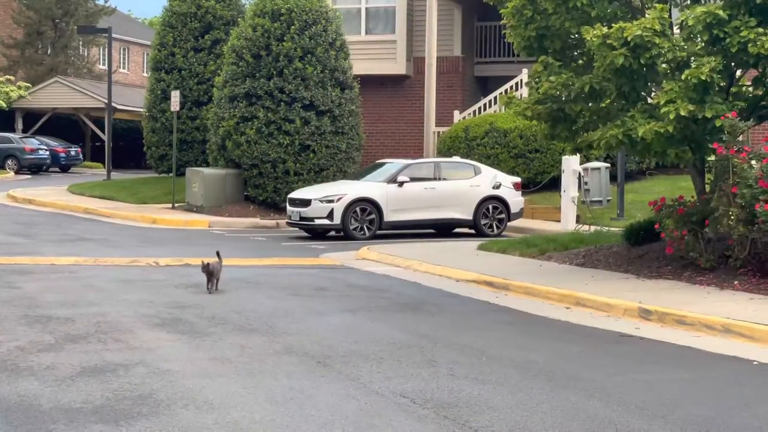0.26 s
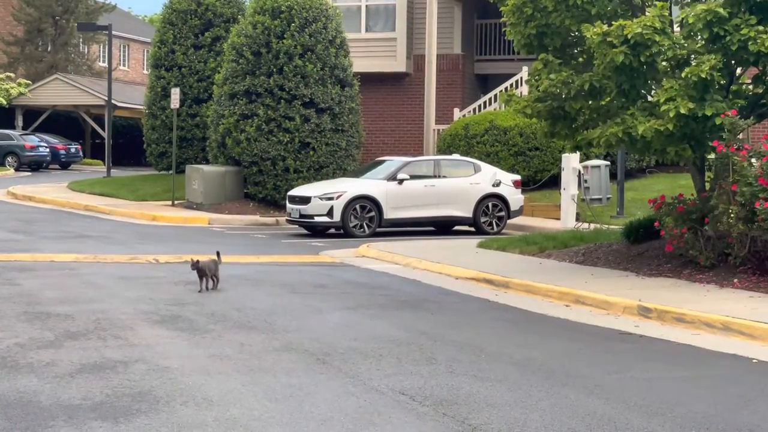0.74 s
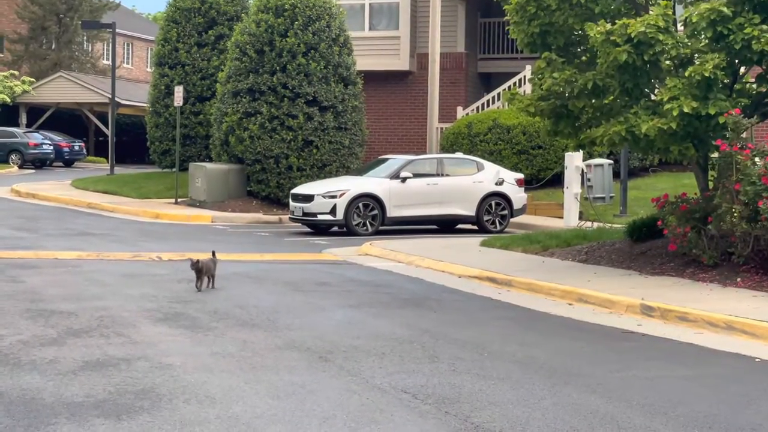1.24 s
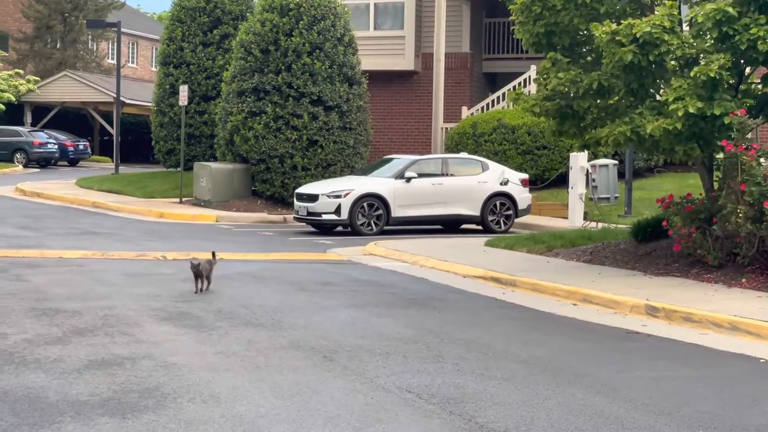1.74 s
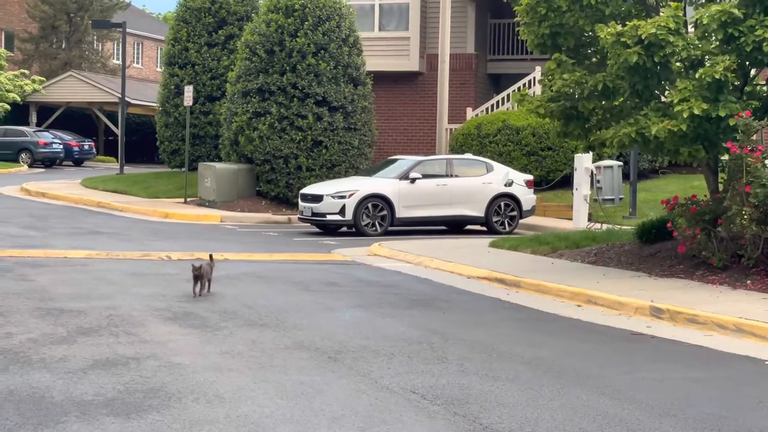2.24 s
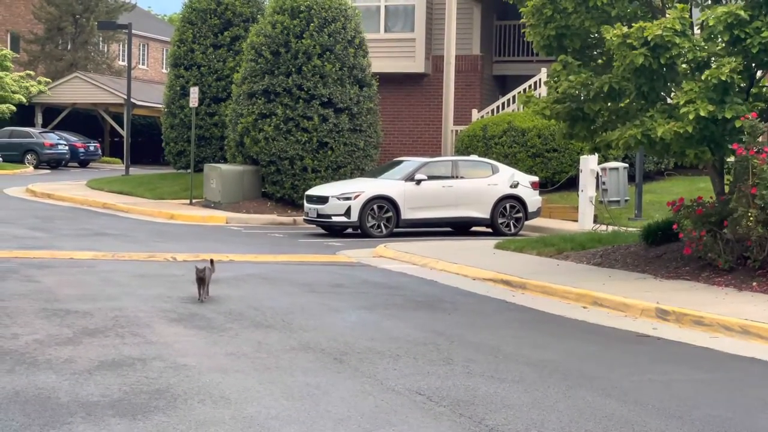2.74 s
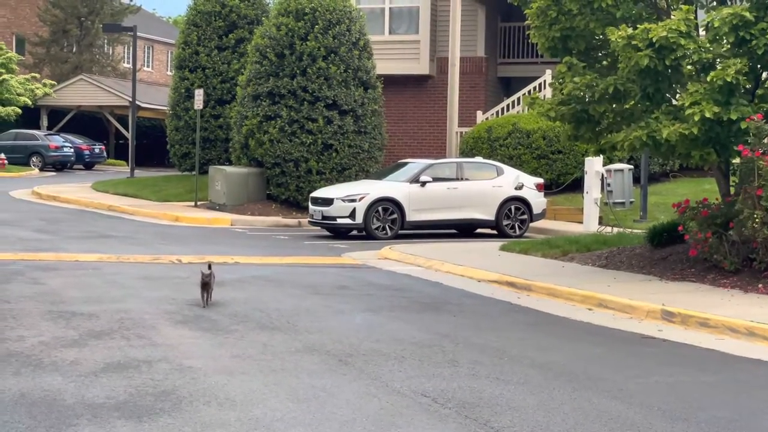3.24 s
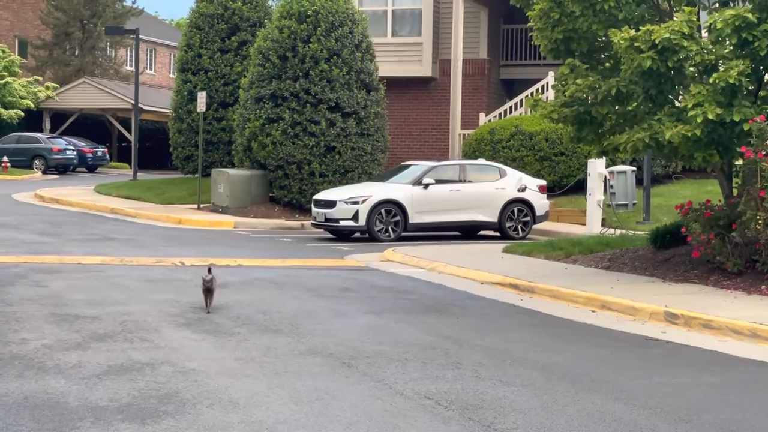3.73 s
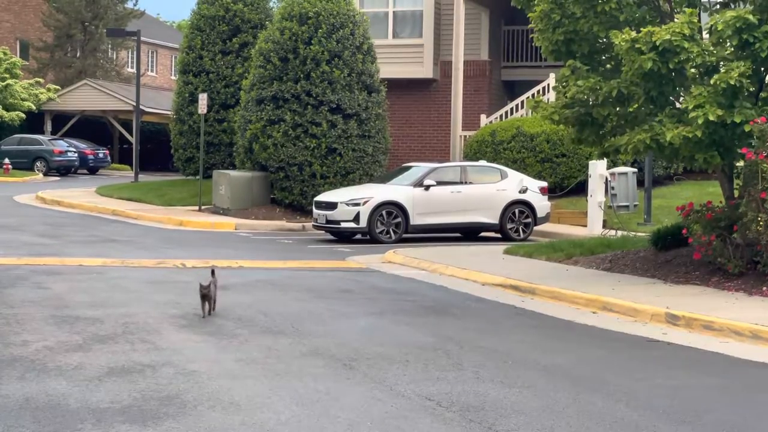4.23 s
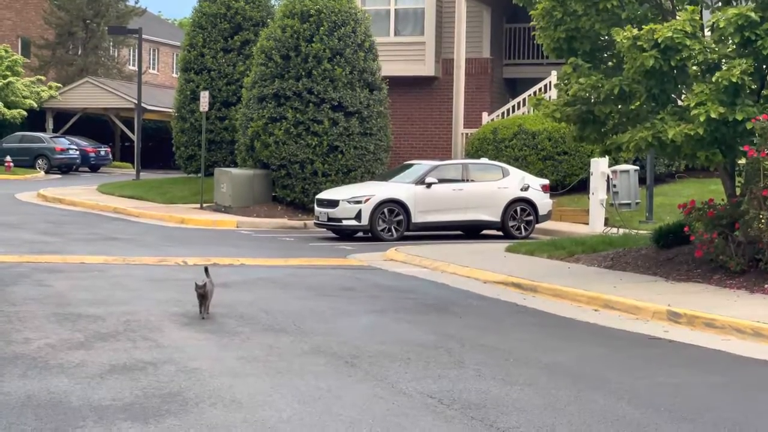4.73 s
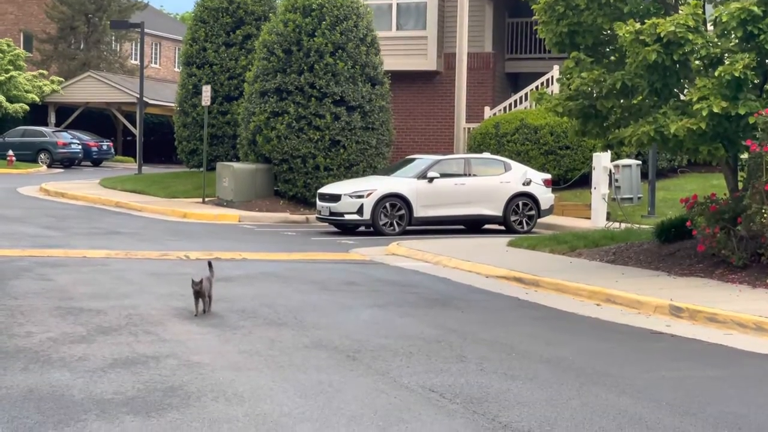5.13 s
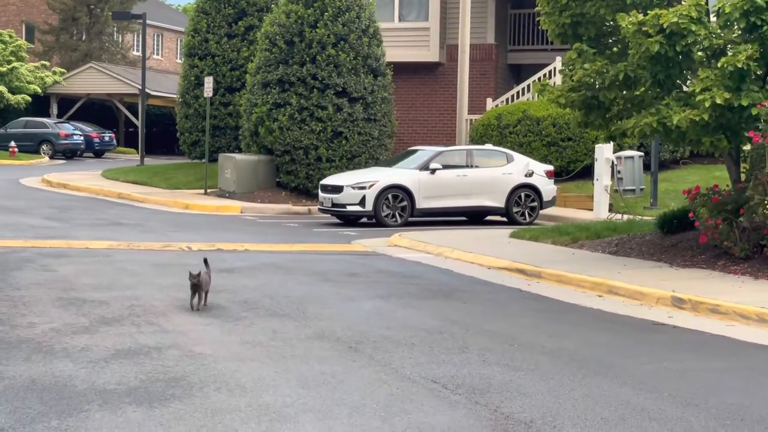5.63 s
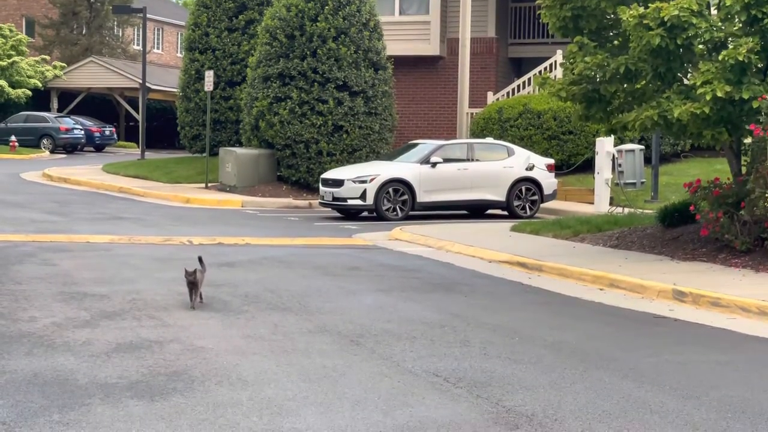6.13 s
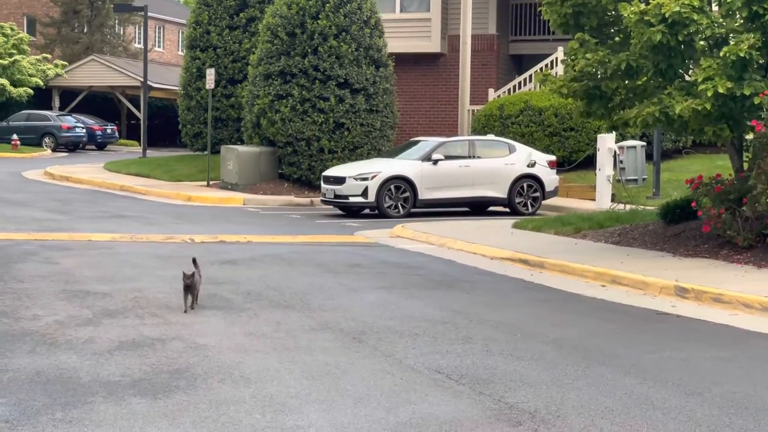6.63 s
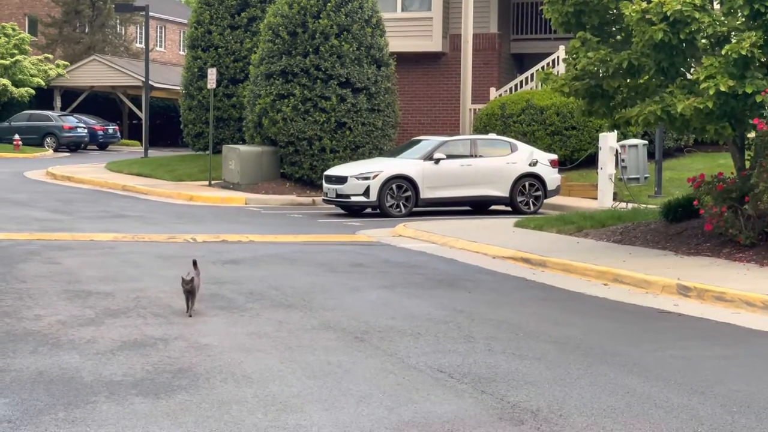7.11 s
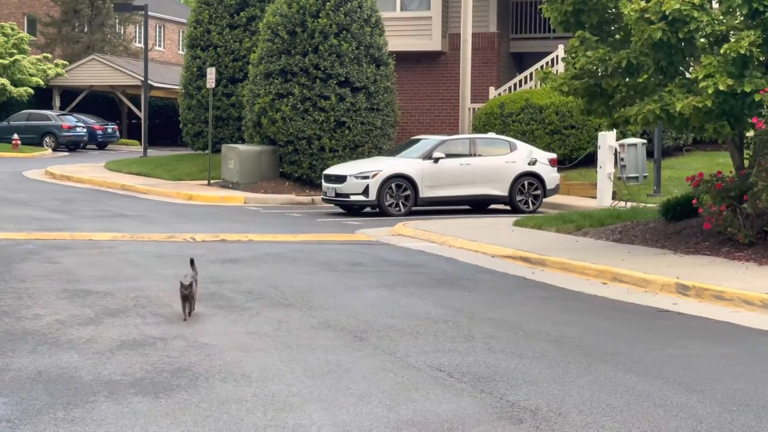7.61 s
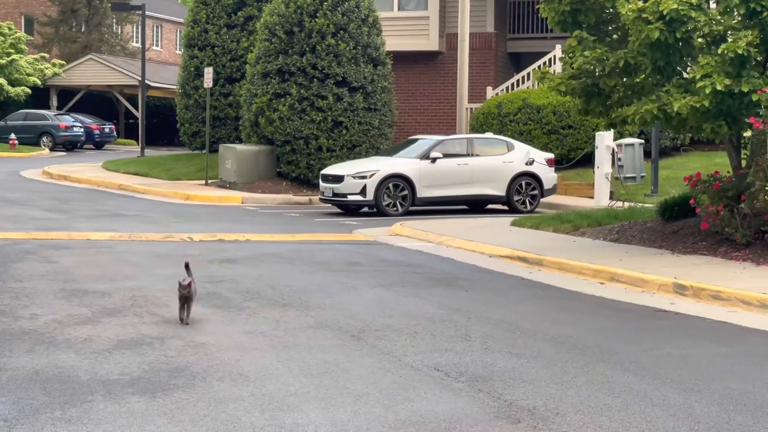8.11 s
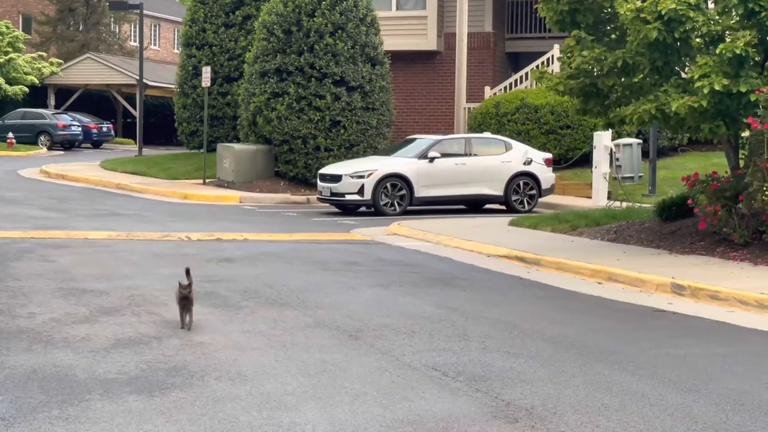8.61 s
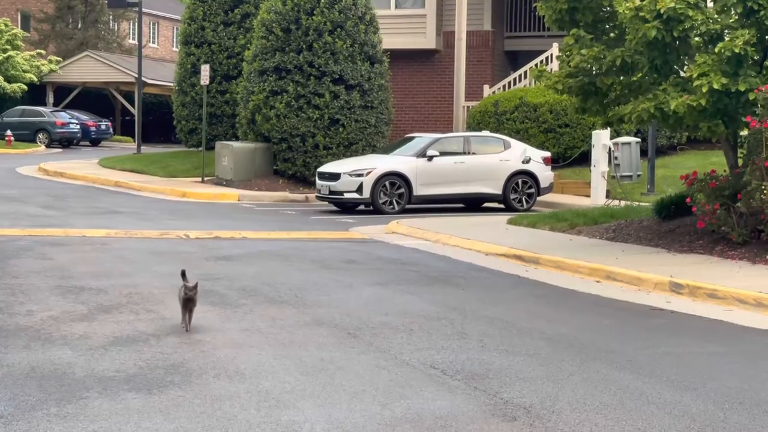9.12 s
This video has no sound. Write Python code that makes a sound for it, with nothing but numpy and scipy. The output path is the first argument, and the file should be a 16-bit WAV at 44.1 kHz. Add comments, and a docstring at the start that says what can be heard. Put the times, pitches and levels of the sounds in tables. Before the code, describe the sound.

A steady, soft low rumble of distant traffic and machinery, with a wavering deep motor hum around 70 Hz, fills an open car park and recedes very slightly. Songbirds sing above it, echoed briefly by brick walls. From 0 to 2 s come rapid harsh chirps and quick sweeps, with two tiny dry clicks near 0.8 s. More warbled chirps follow at 2.8-3.6 s. Mellow sliding whistles around 2.5-3 kHz stand out at 3.8-6 s, strongest near 4.4-4.7, with a dense chirp cluster at 5 s and a click at 5.3. Another burst comes at 6.2-6.6 s. Then it is sparser, a small high two-part call recurring about every second throughout. Clicks tick at 7.9 and 8.1 s. Buzzing trills near 4.7 kHz sound at 8.3 and 8.8 s, then chirps and a thin, piercing whistle at 9.2 s. Very faint far birds twitter behind.

```python
"""Songbirds near and far chirp, whistle and buzz around an open car park between brick walls.
Their notes are sines on moving pitch curves, echoed by sparse reflections off the walls.
Far traffic and machinery make a steady low rumble of shaped noise, with narrow noise drones.
A few small dry clicks close by are noise snaps that ring short resonances."""
import sys
import numpy as np
from scipy import signal
from scipy.fft import rfft, irfft, next_fast_len
from scipy.io import wavfile
from scipy.ndimage import uniform_filter1d

SR = 44100
rng = np.random.default_rng(int(sys.argv[2]) if len(sys.argv) > 2 else 0)


def dump_mix(stems):
    """Bounce the given channels to the path in sys.argv[1] as a 16-bit WAV at rate SR."""
    frames = np.atleast_2d(stems).T  # one column per channel
    limited = np.clip(frames, -1, 1)  # hard clip at full scale
    pcm = np.round(limited * 32767).astype(np.int16)
    wavfile.write(sys.argv[1], SR, pcm)


def to_linear_factor(level_db):
    """Convert decibel levels (scalar or array-like) to linear amplitude factors."""
    exponent = np.asarray(level_db, float) / 20
    return 10 ** exponent


N = 412776

# traffic spectrum before overall scaling: f/Hz, relative level/dB
RUMBLE = [(20, -29.5), (38, -4), (50, 0.5), (62, 0.93), (86, -3), (230, -10), (314, -23.5), (510, -28),
          (1000, -30), (1250, -34), (1900, -38), (4550, -52.5), (6000, -61.5), (8700, -66.5),
          (11400, -67.5), (12300, -73.5), (13000, -88), (22000, -120)]
RUMBLE_RMS_DB = -38
# left-right likeness of the rumble: f/Hz, likeness/1
RUMBLE_LIKENESS = [(60, 0.99), (230, 0.97), (440, 0.79), (860, 0.68), (1500, 0.43), (2100, 1), (4500, 1),
                   (6000, 1), (13000, 0.98)]
# rumble balance: f/Hz, left minus right level/dB
RUMBLE_BALANCE = [(60, 1), (150, 1.0), (350, 1.5), (860, 3), (2080, 0.5), (5040, -1), (12200, 1)]
# steady level slope as traffic recedes: f/Hz, slope/(dB/s)
RECEDE = [(100, -0.35), (200, -.1), (400, -0.71), (900, -0.47), (6000, 0)]
# level drift of the band around THRUM_HZ: t/s, level/dB
THRUM = [(0, 0), (1.2, 0.5), (3, 3), (5, -4), (6, 2.5), (7.3, -2.5), (9.36, 3)]
THRUM_HZ, THRUM_OCTAVES = 184, 0.55
# wavering motor drones: f/Hz, width of each resonator pass/Hz, rms level/dB
DRONES = [(70.5, 27, -42.5), (162.7, 31, -55), (360.9, 24, -65.5)]

# Bird levels are those of the voice, before flutter, distance and echo.
CHORUS_DB, CHORUS_HZ, CHORUS_SPREAD_HZ = -82, 5400, 700
# harsh warbled chirps: t/s, length/s, starting centre f/Hz, warble depth/Hz, level of a strand/dB
CHIRPS = [(0.0, 0.11, 3100, 450, -76), (0.3, .12, 4780, 803, -80), (0.93, .22, 4300, 847, -70.5),
          (1.2, 0.28, 3850, 300, -79.5), (1.56, 0.13, 5250, 402, -72), (1.72, 0.18, 5160, 300, -78),
          (1.909, .22, 3760, 356, -70.5), (1.889, .17, 4700, 350, -76.5), (2.801, .14, 4750, 1100, -76),
          (2.87, 0.16, 3500, 453, -70.5), (3.1, 0.075, 5000, 600, -81), (3.28, .22, 3820, 350, -69),
          (3.278, .17, 4690, 300, -75), (3.47, .12, 4540, 955, -76), (4.76, .1, 4300, 800, -77),
          (4.99, .16, 4460, 400, -74), (4.98, .12, 6200, 600, -90), (5.053, .15, 3300, 400, -66),
          (5.58, .12, 2900, 453, -73), (6.22, 0.32, 5700, 500, -87.5), (6.22, 0.14, 4300, 250, -69),
          (6.302, .15, 3300, 350, -66.5), (6.418, .07, 4420, 200, -78), (8.623, .1, 5200, 900, -83),
          (9.042, 0.22, 3750, 354, -71), (9.08, .14, 4940, 450, -70)]
CHIRP_SAG_HZ_PER_S, CHIRP_FADE_DB, CHIRP_RISE_S = -500, -4.5, 0.019
STROKES_PER_S = 30
FLUTTER_RMS_DB = 4.5  # leaves and moving air break notes up
# quick straight sweeps: t/s, length/s, from f/Hz, to f/Hz, level/dB
SWEEPS = [(0.155, 0.038, 4100, 4600, -72), (0.19, 0.018, 5930, 5340, -67), (0.218, 0.033, 5400, 4200, -73),
          (0.27, .07, 3750, 3100, -69), (0.268, 0.06, 3880, 5130, -70), (0.299, 0.056, 5800, 4770, -73.5),
          (0.92, .07, 4840, 5600, -78), (0.93, 0.089, 4400, 3400, -74), (1.645, 0.018, 3600, 4700, -67),
          (1.678, .025, 3600, 5000, -65), (1.89, .04, 5460, 4240, -72), (2.22, 0.063, 5800, 5200, -81),
          (3.254, 0.03, 5000, 3880, -65), (5.045, 0.032, 2750, 3500, -61),
          (5.087, 0.042, 3400, 2300, -64.5), (5.6, 0.071, 3600, 3090, -72), (6.265, 0.026, 4030, 2920, -69),
          (6.29, 0.034, 4470, 3300, -63.5), (6.32, 0.032, 4270, 3300, -66), (6.423, .02, 3500, 2750, -69),
          (6.57, .04, 5700, 5000, -83), (7.2, .1, 3200, 2390, -80), (7.6, 0.077, 3850, 3500, -78)]
SWEEP_WARBLE_HZ, WHISTLE_WARBLE_HZ = 90, 35
# two-part call about once a second: hook t/s, lead level/dB, hook level/dB
HOOKS = [(0.74, -85, -88), (1.79, -78, -72), (2.65, -73.5, -75.5), (3.52, -79, -73), (4.53, -87, -69),
         (5.66, -82, -68), (6.75, -86, -69), (7.77, -85, -68), (8.5, -84, -73)]
LEAD_HZ, LEAD_EARLY_S, LEAD_S = 5250, .045, .06
HOOK_START_HZ, HOOK_DIP_HZ, HOOK_END_HZ, HOOK_S, HOOK_DIP_DB = 4300, 4030, 4420, .075, -2.5
# held whistles: t/s, length/s, from f/Hz, held f/Hz, starting level/dB
WHISTLES = [(3.45, .08, 2700, 2540, -67.5), (3.873, .11, 2650, 2500, -70.5),
            (3.84, 0.097, 3050, 2950, -74.5), (4.039, 0.055, 2670, 2610, -67),
            (4.416, .11, 3650, 2800, -59), (4.55, .05, 2880, 2830, -61.5), (4.589, 0.15, 2440, 2567, -58.5),
            (4.68, 0.054, 2910, 2880, -63), (4.791, .06, 2550, 2460, -68), (4.861, .1, 2550, 2610, -71),
            (4.99, .12, 2650, 2760, -63.5), (5.01, .04, 5660, 5700, -80), (5.009, 0.051, 3950, 3750, -70),
            (5.13, .04, 2290, 2130, -69), (5.534, .03, 3050, 2990, -62), (5.58, .09, 2700, 2440, -66),
            (5.742, 0.058, 2720, 2600, -66.5), (5.82, .07, 2650, 2460, -69), (5.93, .06, 2550, 2500, -76),
            (9.03, .23, 3780, 3870, -65), (9.077, 0.18, 3420, 3450, -68), (9.342, .02, 3400, 3330, -64)]
SLIDE_S, WHISTLE_FADE_DB = .022, -3
# one list per buzzing trill: t/s, level/dB, centre f/Hz
BUZZES = [
    [(8.3, -75, 4840), (8.326, -60, 4780), (8.392, -62.5, 4750), (8.4, -65, 4750), (8.43, -57.5, 4790),
     (8.596, -78, 4830), (8.62, -73, 4810)],
    [(8.735, -69, 4570), (8.763, -59, 4620), (8.797, -52, 4640), (8.857, -62.5, 4620), (8.905, -58.5, 4660),
     (9.043, -73, 4600), (9.07, -65, 4640)],
]
BUZZ_PER_S, BUZZ_DEPTH_HZ, BUZZ_THROB_RATIO = 180, 272, 0.23
# thin high whistle: t/s, level/dB
SEEP = [(9.145, -84), (9.165, -68), (9.204, -55.5), (9.228, -79), (9.25, -54), (9.28, -51.5), (9.36, -65)]
SEEP_HZ = 7255
YARD_T60_S, YARD_LIKENESS, YARD_RISE_S = 0.78, 0.98, 0.012
YARD_DULL_HZ = 6560  # leaves and air take treble out of the echoes
NEAR_YARD_DB, FAR_YARD_DB, FAR_DIRECT_DB = -4.5, -0.5, -3  # far: more echo than direct sound

# clicks: t/s, direct peak level/dB, colour f/Hz, ring t60/s, echo delay/s
CLICKS = [(0.7774, -30.5, 7600, 0.013, .0023), (0.8404, -33, 8250, 0.015, .0045),
          (5.2908, -32.5, 7570, 0.0075, .0018), (7.8406, -60.5, 6000, .012, .0027),
          (7.9155, -32.5, 8900, 0.006, .0015), (8.132, -29.5, 6670, 0.0088, .0022),
          (8.9436, -64, 6300, .012, .003)]
# modes shared by all clicks: f/Hz, width of each resonator pass/Hz, level re colour mode/dB
CLICK_BODY = [(3500, 1500, -9), (5800, 1400, -6.5), (9720, 800, -2.5), (11300, 1100, -5.5),
              (14800, 1500, -14)]
CLICK_ECHO_DB, CLICK_TAIL_DB, CLICK_TAIL_T60_S = -16.5, -19, .3

# phase gap of the two microphone ports, out of step in the treble: f/Hz, left lead/rad
PORTS = [(2200, 0), (3200, 0.64), (4600, 0.5), (6800, -1.2), (7750, -0.5), (8700, 0.1), (9650, -2.5),
         (10600, -3), (11540, -6.5), (12500, -6), (13500, -7.3)]
LOW_CUT_HZ = 40.5


def evened(x):
    """Scales to rms 1."""
    return x / np.sqrt(np.mean(x ** 2) + 1e-20)


def read(points, hz):
    """Interpolates (f/Hz, value) on a log-frequency axis."""
    f, value = np.transpose(points)
    return np.interp(np.log(hz + 1), np.log(f + 1), value)


def add(mix, s, sound):
    """Mixes a sound in at time s, in place."""
    part = mix[round(s * SR):][:len(sound)]
    part += sound[:len(part)]


def resonate_twice(x, hz, width_hz):
    """Two passes of a fixed resonance with peak gain 1."""
    b, a = signal.iirpeak(hz, hz / width_hz, SR)
    return signal.lfilter(b, a, signal.lfilter(b, a, x))


def wander(size, hz):
    """Smooth low-passed noise of rms 1, up to about hz."""
    b, a = signal.butter(2, hz, fs=SR)
    return evened(signal.lfilter(b, a, rng.standard_normal(size + 2000))[2000:])


def whistle(hz, db, fade_s=0.0028):
    """Sine of rms level db on a pitch curve, with soft ends."""
    index = np.arange(len(hz))
    edge = np.minimum(index, index[::-1]) / (fade_s * SR)
    envelope = np.sin(np.pi / 2 * np.minimum(edge, 1))
    return np.sqrt(2) * to_linear_factor(db) * np.sin(2 * np.pi * np.cumsum(hz) / SR) * envelope


def voice(hz, db, warble_hz, strokes=False):
    """One strand of song: whistle with uneven warble, or with repeated steep falling strokes."""
    if strokes:
        cycles = STROKES_PER_S * np.arange(len(hz)) / SR + .15 * wander(len(hz), 12)
        swing = 1.5 - 3 * (cycles % 1)
    else:
        swing = 1.6 * np.tanh(.45 * wander(len(hz), 60))
    rasp_hz = 35 * wander(len(hz), 150)
    flutter_db = FLUTTER_RMS_DB * wander(len(hz), 45)
    return whistle(hz + warble_hz * swing + rasp_hz, db + flutter_db)


def sampled(rows):
    """Start time, then time and the columns of a curve at every sample."""
    s, *columns = np.transpose(rows)
    t = np.arange(s[0], s[-1], 1 / SR)
    return s[0], t, *(np.interp(t, s, c) for c in columns)


def tail(t60_s, likeness, rise_s):
    """Sparse random-sign reflections that die away, partly alike left and right; left energy 1."""
    size = SR // 2
    hits = rng.random((2, size)) < 1500 / SR
    taps = rng.choice([-1., 1.], (2, size)) * hits
    t = np.arange(size) / SR
    taps *= to_linear_factor(-60 * t / t60_s) * np.minimum(t / rise_s, 1)
    right = likeness * taps[0] + np.sqrt(1 - likeness ** 2) * taps[1]
    return np.array([taps[0], right]) / np.linalg.norm(taps[0])


def rumble():
    """Random short-time spectra of far engines, tyres and fans that slowly recede."""
    frames, hz = N // 512 + 5, np.fft.rfftfreq(2048, 1 / SR)
    a, b, c, d, patches = rng.standard_normal((frames, 1025, 5)).T
    patches = evened(uniform_filter1d(uniform_filter1d(patches, 16, 0), 10, 1))
    t = np.arange(frames) * 512 / SR
    thrum_band = np.exp(-(np.log2((hz + 1) / THRUM_HZ) / THRUM_OCTAVES) ** 2)
    recede_db = np.outer(read(RECEDE, hz), t - t.mean())
    thrum_db = np.outer(thrum_band, np.interp(t, *np.transpose(THRUM)))
    balance_db = read(RUMBLE_BALANCE, hz)[:, None] * [[[.5]], [[-.5]]]
    likeness = np.clip(read(RUMBLE_LIKENESS, hz), -1, 1)[:, None]
    left = a + 1j * b
    right = likeness * left + np.sqrt(1 - likeness ** 2) * (c + 1j * d)
    level_db = read(RUMBLE, hz)[:, None] + 0.75 * patches + recede_db + thrum_db + balance_db
    spectra = np.array([left, right]) * to_linear_factor(level_db)
    noise = signal.istft(spectra, nperseg=2048, noverlap=1536)[1][:, :N]
    return to_linear_factor(RUMBLE_RMS_DB) * evened(noise)


def drones():
    """Distant motors: noise through narrow resonances, wavering in level."""
    out = np.zeros(N)
    for hz, width_hz, db in DRONES:
        out += to_linear_factor(db) * evened(resonate_twice(rng.standard_normal(N), hz, width_hz))
    return out


def chorus(count=40):
    """Much further birds: faint short gliding chirps at random moments."""
    out = np.zeros(N)
    for at, pitch, glide in rng.random((count, 3)):
        centre_hz = CHORUS_HZ + CHORUS_SPREAD_HZ * (2 * pitch - 1)
        hz = centre_hz + np.linspace(0, 900 * (glide - .6), 3000)
        add(out, at * N / SR, whistle(hz + 250 * wander(3000, 80), CHORUS_DB))
    return out


def chirps():
    """Three warbling strands, one in falling strokes, sag in pitch and fade."""
    out = np.zeros(N)
    for s, length_s, start_hz, warble_hz, db in CHIRPS:
        t = np.arange(0, length_s, 1 / SR)
        hz = start_hz + CHIRP_SAG_HZ_PER_S * t
        fading_db = db + CHIRP_FADE_DB * t / length_s
        rise = np.minimum(t / CHIRP_RISE_S, 1)
        for strokes in (False, True, False):
            add(out, s, voice(hz, fading_db, warble_hz, strokes) * rise)
    return out


def sweeps():
    """Near-pure notes on straight pitch ramps."""
    out = np.zeros(N)
    for s, length_s, from_hz, to_hz, db in SWEEPS:
        hz = np.linspace(from_hz, to_hz, round(length_s * SR))
        add(out, s, voice(hz, db, SWEEP_WARBLE_HZ))
    return out


def hooks():
    """One bird's call: a high lead note, then a hook that dips and rises in pitch."""
    out = np.zeros(N)
    for s, lead_db, hook_db in HOOKS:
        lead_hz = np.full(round(LEAD_S * SR), LEAD_HZ)
        add(out, s - LEAD_EARLY_S, voice(lead_hz, lead_db, WHISTLE_WARBLE_HZ))
        u = np.linspace(0, 1, round(HOOK_S * SR))
        hz = np.interp(u, [0, .5, 1], [HOOK_START_HZ, HOOK_DIP_HZ, HOOK_END_HZ])
        dip_db = HOOK_DIP_DB * np.sin(np.pi * u ** 0.57)
        add(out, s, voice(hz, hook_db + dip_db, SWEEP_WARBLE_HZ))
    return out


def clicks():
    """A sub-millisecond snap rings a small hard body, with one close echo and a faint tail."""
    dry, t = np.zeros(N), np.arange(800) / SR
    for s, db, colour_hz, t60_s, delay_s in CLICKS:
        snap = rng.standard_normal(800) * (0.4 * np.exp(-t / 0.00033) + 0.13 * to_linear_factor(-60 * t / t60_s))
        snap[0] = 3.6  # the first crack is the sharpest
        ring = np.zeros(800)
        for hz, width_hz, mode_db in [(colour_hz, 2200, 0)] + CLICK_BODY:
            ring += to_linear_factor(mode_db) * evened(resonate_twice(snap, hz, width_hz))
        ring = to_linear_factor(db) * ring / abs(ring).max()
        add(dry, s, ring)
        add(dry, s + delay_s, to_linear_factor(CLICK_ECHO_DB) * ring)
    b, a = signal.iirpeak(6500, 6500 / 4000, SR)
    sent = dry
    for _ in range(3):
        sent = signal.lfilter(b, a, sent)
    echo = signal.fftconvolve(sent[None], tail(CLICK_TAIL_T60_S, 0.99, .04), axes=1)[:, :N]
    return dry + to_linear_factor(CLICK_TAIL_DB) * echo


def whistles():
    """Near-pure notes slide exponentially onto a held pitch and fade."""
    out = np.zeros(N)
    for s, length_s, from_hz, held_hz, db in WHISTLES:
        t = np.arange(0, length_s, 1 / SR)
        hz = held_hz + (from_hz - held_hz) * np.exp(-t / SLIDE_S)
        add(out, s, voice(hz, db + WHISTLE_FADE_DB * t / length_s, WHISTLE_WARBLE_HZ))
    return out


def buzzes():
    """Fast, nearly even warble of pitch and level makes each trill buzz."""
    out = np.zeros(N)
    for rows in BUZZES:
        s, t, db, hz = sampled(rows)
        phase = 2 * np.pi * BUZZ_PER_S * t + .4 * wander(len(t), 26)
        hz = hz + 22 * wander(len(t), 30) + BUZZ_DEPTH_HZ * np.sin(phase)
        throb = 1 + BUZZ_THROB_RATIO * np.cos(phase)
        add(out, s, whistle(hz, db + 3 * wander(len(t), 30)) * throb)
    return out


def seep():
    """Thin high whistle: a sine wavering slightly in pitch and level."""
    out = np.zeros(N)
    s, t, db = sampled(SEEP)
    hz = SEEP_HZ + 5 * wander(len(t), 40)
    add(out, s, whistle(hz, db + 1.7 * wander(len(t), 40), fade_s=.002))
    return out


def birds():
    """Clear notes nearby, harsh chirps and buzzes far off, all echoed by the walls."""
    near = sweeps() + hooks() + whistles() + seep()
    far = chorus() + chirps() + buzzes()
    sent = to_linear_factor(NEAR_YARD_DB) * near + to_linear_factor(FAR_YARD_DB) * far
    sent = signal.lfilter(*signal.butter(2, YARD_DULL_HZ, fs=SR), sent)
    walls = tail(YARD_T60_S, YARD_LIKENESS, YARD_RISE_S)
    echo = signal.fftconvolve(sent[None], walls, axes=1)[:, :N]
    return near + to_linear_factor(FAR_DIRECT_DB) * far + echo


def scene():
    """All sources at the microphone."""
    return rumble() + drones() + birds() + clicks()


def roll_off(x):
    """The treble ends steeply here."""
    return signal.sosfilt(signal.butter(12, 12830, fs=SR, output="sos"), x)


def record(dry):
    """Each port turns the phase by half of their gap, in opposite senses; then a low cut."""
    size = next_fast_len(N + 4096)
    lead_rad = read(PORTS, np.fft.rfftfreq(size, 1 / SR))
    turn = np.exp(1j * lead_rad * [[.5], [-.5]])
    ported = irfft(rfft(dry, size) * turn, size)[:, :N]
    low_cut = signal.butter(4, LOW_CUT_HZ, "high", fs=SR, output="sos")
    mix = signal.sosfilt(low_cut, ported)
    return roll_off(mix)


dry = scene()
out = record(dry)
dump_mix(out)
```